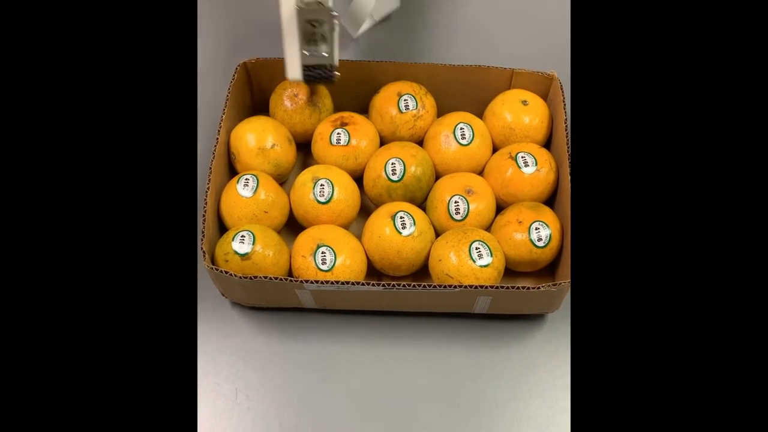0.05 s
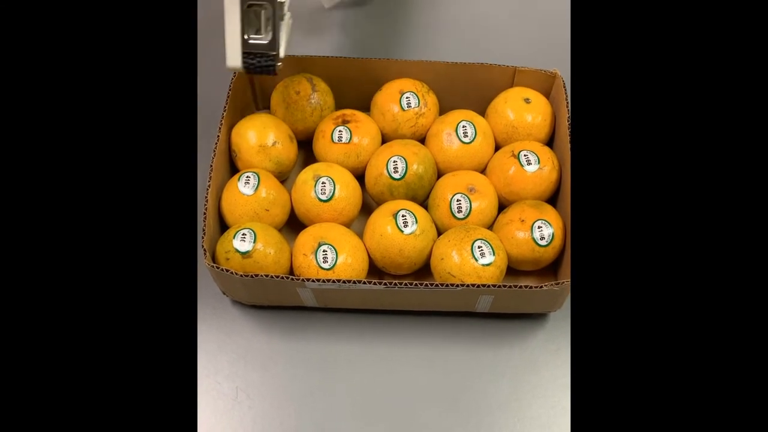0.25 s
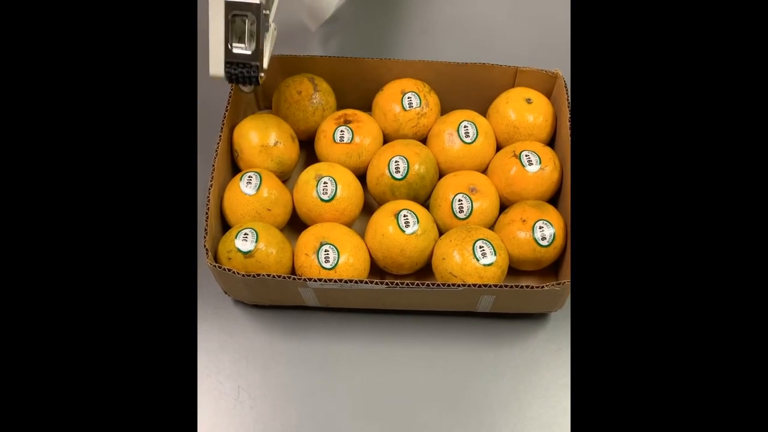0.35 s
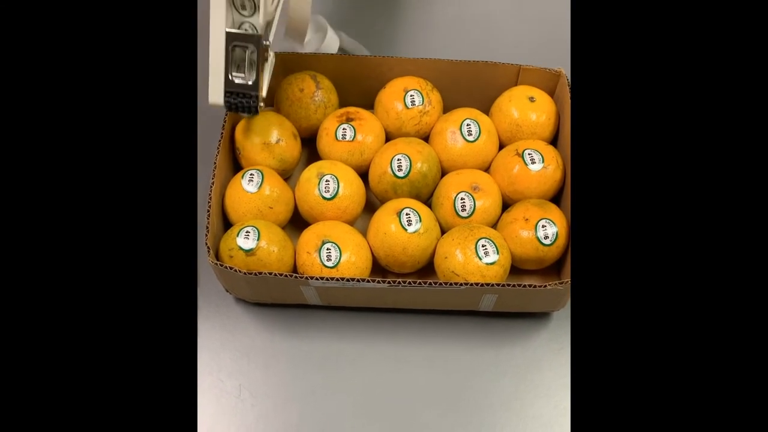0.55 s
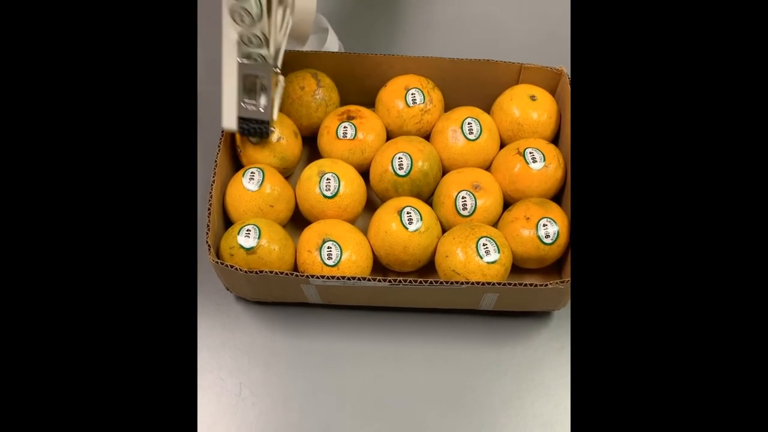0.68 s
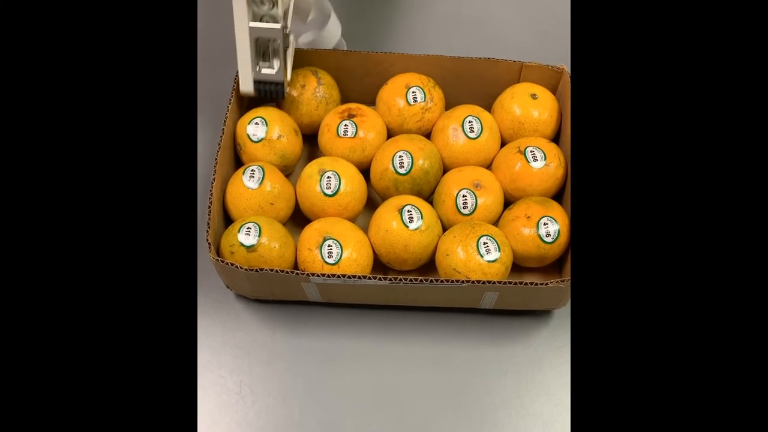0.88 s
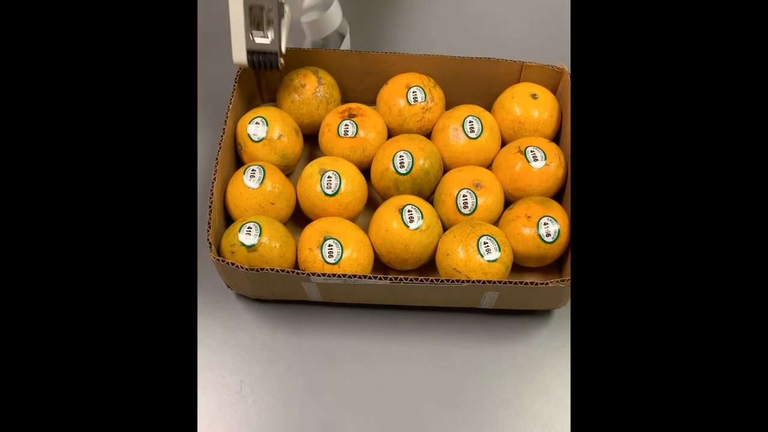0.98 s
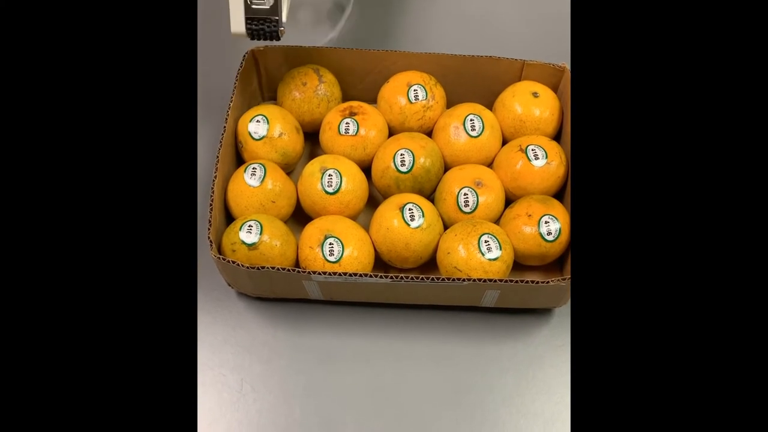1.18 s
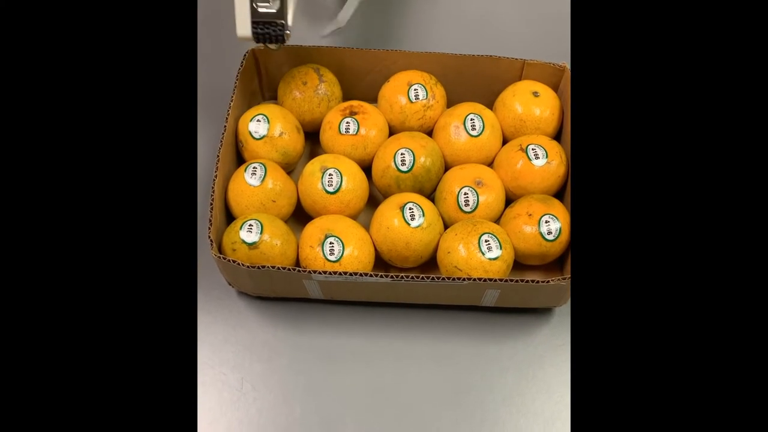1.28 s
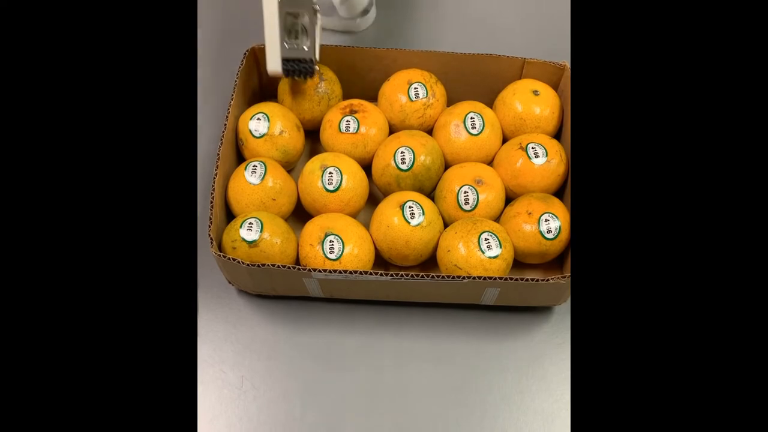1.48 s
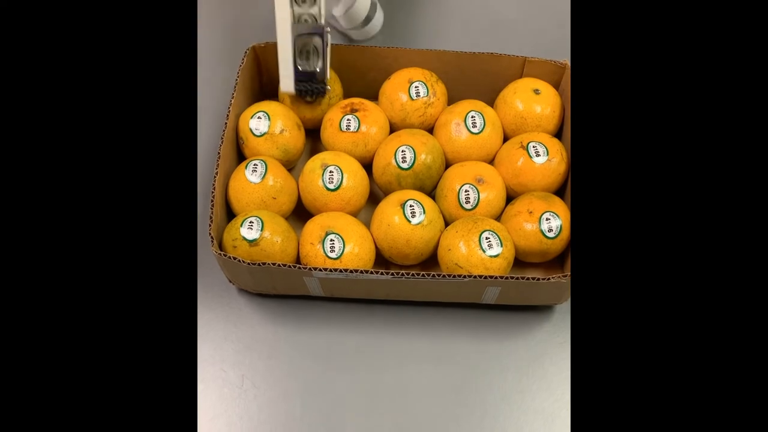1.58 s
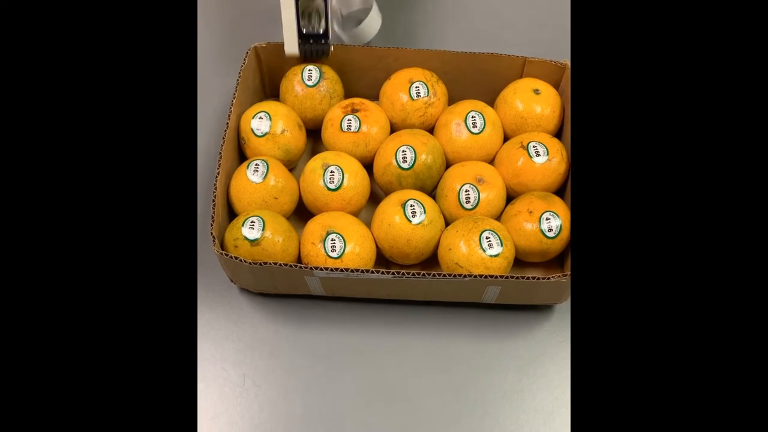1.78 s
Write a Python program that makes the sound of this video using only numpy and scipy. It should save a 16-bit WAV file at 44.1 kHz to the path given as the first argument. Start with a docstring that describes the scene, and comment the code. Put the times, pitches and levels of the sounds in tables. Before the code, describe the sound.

Two bursts of plastic clicking and ratcheting from a label applicator pressing stickers onto fruit.

```python
"""Labelling fruit in a box

A small room, a close stereo pair, a handheld applicator putting stickers on two fruits in a cardboard
box. Each time the backing tape rasps forward ever louder, the catch snaps and the ratchet rattles back,
ringing the plastic housing. Then the head lands on a fruit, the box thumps on the table and the
sticker crackles. Quiet room air and mains hum lie underneath."""
import sys
import numpy as np
from scipy import signal
from scipy.fft import rfft, irfft
from scipy.io import wavfile

SR = 44100
rng = np.random.default_rng(int(sys.argv[2]) if len(sys.argv) > 2 else 0)


def to_wav(sig):
    """Store sig (one row per channel, or 1-D mono) as 16-bit WAV at the path in sys.argv[1].

    Samples outside -1..1 are clipped; the rate is SR.
    """
    pcm = np.clip(np.atleast_2d(sig), -1, 1) * 32767
    pcm = np.round(pcm).astype(np.int16)
    wavfile.write(sys.argv[1], SR, pcm.T)  # frames by channels


N = 81585
T = np.arange(N) / SR

# Modes of the plastic housing. Each row: frequency in Hz, level in dB, t60 in seconds.
HOUSING_MODES = [(458, -16, 0.13), (934.6, -2.5, 0.12), (1182, -12, .07), (1385, -6.5, .05),
                 (1453, -8.5, 0.15), (1550, -3.5, 0.12), (1852, -1, .055), (1920, -4.5, 0.042),
                 (2377, -6, 0.11), (2820, -7, .035), (3300, -13, 0.051), (4440, -7.5, .025)]
# Spectrum of the housing's short clack. Each row: frequency in Hz, relative level in dB.
CLACK_COLOUR = [(40, -55), (130, -40), (280, -17.5), (650, -17.5), (950, -5), (1300, 3), (1900, 0),
                (2500, -6.5), (3200, -14), (6000, -33.5)]

TREBLE_LEAD_S, BODY_LEAD_S = 0.00012, 0.00005  # the left microphone hears it this much sooner
TICK_ROOM = dict(early_db=-12.5, late_db=-32.5, lead_s=TREBLE_LEAD_S)
BOX_ROOM = dict(early_db=-2, late_db=-15.5, lead_s=BODY_LEAD_S)


def undb(db):
    """Decibels to gain."""
    return 10 ** (np.asarray(db) / 20)


def unit(x):
    """Scale a response to unit energy."""
    return x / np.sqrt(np.sum(x ** 2))


def through(x, response):
    """Play a signal through a response."""
    return signal.fftconvolve(x, response)[:N]


def colour(points, size=2048):
    """Minimum-phase response of unit energy, shaped by (Hz, dB) points."""
    hz, db = np.array(points).T
    gain = undb(np.interp(np.log(np.fft.rfftfreq(size, 1 / SR) + 1), np.log(hz), db))
    cepstrum = irfft(np.log(gain))
    cepstrum[1:size // 2] *= 2
    cepstrum[size // 2 + 1:] = 0
    return unit(irfft(np.exp(rfft(cepstrum))))


def ring(modes, pitch=1, size=22000):
    """Damped sines of a struck object, alternating in sign."""
    t = T[:size]
    return sum((-1) ** k * undb(db - 60 * t / t60) * np.sin(2 * np.pi * hz * pitch * t)
               for k, (hz, db, t60) in enumerate(modes))


def blow(s):
    """A single impulse at s seconds."""
    return 1. * (np.arange(N) == int(s * SR))


def fade(s, decay_s, attack_s=.0001):
    """Quick rise that ends at s, exponential release."""
    return np.exp(-np.maximum(s - T, 0) / attack_s - np.maximum(T - s, 0) / decay_s)


def grit(per_s, scatter_db=4):
    """Dense stick-slip grains of uneven size, rms 1."""
    slips = rng.random(N) < per_s / SR
    sizes = slips * undb(scatter_db * np.clip(rng.standard_normal(N), -2, 2))
    energy = np.abs(through(sizes ** 2, fade(0, 0.00045)))
    grains = np.sqrt(energy) * rng.standard_normal(N)
    return grains / np.std(grains)


def clacks(strike_db=12, chatter_db=-3, grip_detune=0.041):
    """Catch, lever and head scrape home, strike the housing and chatter. Gives crack and body."""
    # Each row: time in seconds, crack level in dB, housing level in dB, crack decay in seconds.
    strikes = [(0.1018, -53, -52.5, 0.00159), (0.1269, -47, -46.5, 0.00245), (0.1750, -43, -49.5, 0.0015),
               (0.1852, -47.5, -45.5, 0.0055), (0.214, -36.5, -38.5, 0.0043), (0.2343, -22, -39, 0.0024),
               (0.2394, -17, -28, 0.00178), (0.2427, -38, -28, 0.003), (0.3797, -51.5, -43, 0.009),
               (0.4014, -25, -30.5, 0.0014), (0.4123, -22, -33, 0.0037), (0.461, -30, -53, 0.00153),
               (0.4792, -31.5, -38, .0035), (0.6096, -74, -47.5, 0.00076), (0.6180, -36, -53, .003),
               (0.6231, -28, -40, 0.0013), (0.6426, -46.5, -47, 0.0059), (0.8490, -60, -62, 0.0017),
               (1.0050, -54, -56, .0028), (1.0304, -45, -48.5, 0.0038), (1.057, -57.5, -64.5, 0.0055),
               (1.0809, -45, -51.5, .0022), (1.0956, -41.5, -47, 0.0023), (1.1358, -20.5, -38.5, 0.0034),
               (1.142, -23.5, -25.5, 0.0019), (1.1446, -36, -39.5, 0.0014), (1.2752, -46, -35.5, 0.0025),
               (1.2942, -30.5, -37.5, 0.011), (1.3754, -28.5, -39, 0.0026), (1.4930, -80, -58.5, 0.0013),
               (1.5070, -36, -54, 0.0054), (1.5127, -30, -40.5, 0.0008), (1.5380, -46, -54.5, 0.006)]
    pitches = 1 + grip_detune * rng.uniform(-1, 1, 64)  # the grip shifts the modes from clack to clack
    chatter = rng.standard_normal(N)
    crack, body = 0, 0
    for (s, db, body_db, decay), pitch in zip(strikes, pitches):
        envelope = fade(s, decay, attack_s=0.0013)
        push = undb(strike_db) * blow(s) + undb(chatter_db) * envelope * chatter
        crack += undb(db) * envelope
        body += undb(body_db) * housing(push, pitch)
    return crack * rng.standard_normal(N), body


def ratchet(teeth_per_s=620, tooth_s=.0013, jitter=0.1, scatter_db=1.5, ring_db=-5, clatter_db=-3):
    """The pawl skips over a quick, uneven run of teeth. Gives crack and body."""
    # Each row: start and end in seconds, crack and housing levels in dB, housing pitch ratio.
    runs = [(0.4196, 0.4404, -25.5, -30, .87), (1.3019, 1.3203, -25, -30.5, 0.99)]
    crack, body = 0, 0
    for start, end, db, body_db, pitch in runs:
        offsets, sizes = rng.standard_normal((64, 2)).T
        times = start + (np.arange(len(offsets)) + jitter * offsets) / teeth_per_s
        teeth = sum(undb(scatter_db * size) * fade(s, tooth_s)
                    for s, size in zip(times, sizes) if s < end)
        crack += undb(db) * teeth * rng.standard_normal(N)
        clatter = undb(clatter_db) * through(teeth * rng.standard_normal(N), colour(CLACK_COLOUR))
        body += undb(body_db) * (clatter + undb(ring_db) * housing_sustain(teeth, pitch))
    return crack, body


def tape(grains_per_s=1500, stop_s=0.0011, feed_body_db=-13):
    """The backing tape rasps louder as it speeds up; the sticker is rubbed on. Gives rasp and body."""
    # Each row: start and end in seconds, level at the end in dB, rise in dB per second.
    feeds = [(0.10, 0.236, -32, 300), (0.995, 1.139, -28.5, 325)]
    # Sticker on peel. Each row: middle and half length in seconds, rasp and housing levels in dB.
    rubs = [(0.648, .028, -53, -54), (1.565, .03, -65, -65), (1.657, .022, -53, -58),
            (1.727, .012, -56, -61)]
    rasp = 0
    for start, end, db, rise in feeds:
        gate = (T > start) * np.exp(-np.maximum(T - end, 0) / stop_s)
        rasp += undb(db - rise * np.abs(end - T)) * gate
    push = undb(feed_body_db) * rasp
    for s, half, db, body_db in rubs:
        swell = np.exp(-((T - s) / half) ** 2)
        rasp += undb(db) * swell
        push += undb(body_db) * swell
    return rasp * grit(grains_per_s), housing(push * grit(grains_per_s))


def housing(push, pitch=1, ring_db=-6.5):
    """The plastic shell gives a short clack and rings on in its modes."""
    ringing = undb(ring_db) * unit(ring(HOUSING_MODES, pitch, size=6000))
    clack = colour(CLACK_COLOUR)
    return through(push, ringing + np.pad(clack, (0, len(ringing) - len(clack))))


def housing_sustain(push, pitch, waver_rad=0.011):
    """A run of blows keeps the shell ringing; each mode's energy builds and decays, its phase wanders."""
    ringing = 0
    for hz, db, t60 in HOUSING_MODES:
        decay = undb(-60 * T / t60) ** 2
        energy = np.abs(through(push ** 2, decay / decay.sum()))
        phase = 2 * np.pi * hz * pitch * T + waver_rad * np.cumsum(rng.standard_normal(N))
        ringing += undb(db) * np.sqrt(energy) * np.sin(phase)
    return ringing


def latch(at_s=1.3746, level_db=-15.5, swell_s=0.0012):
    """A short metallic ping that swells as the latch slides home."""
    # Each row: frequency in Hz, level in dB, t60 in seconds.
    modes = [(4150, -8, .014), (4530, 0, .02), (7100, -12, .01), (9900, -12, .01)]
    ping = ring(modes)
    ping *= np.minimum(T[:len(ping)] / swell_s, 1)
    return in_room(undb(level_db) * through(blow(at_s), ping), **TICK_ROOM)


def spring():
    """The spring in the head twangs as it is loaded."""
    # Each row: time in seconds, level in dB.
    twangs = [(0.1277, -46), (1.0304, -47), (1.5121, -50)]
    # Each row: frequency in Hz, level in dB, t60 in seconds.
    modes = [(1260, -7, .03), (1512, -1.5, .04)]
    return through(sum(undb(db) * blow(s) for s, db in twangs), ring(modes))


def ticks():
    """Thin, bright snaps of sticker and tape."""
    # Each row: time in seconds, level in dB, decay in seconds.
    snaps = [(0.4760, -17, 0.00099), (0.649, -35, 0.0042), (0.6711, -31, 0.0031), (0.6900, -36.5, 0.0015),
             (0.724, -47.5, 0.0017), (0.7372, -47, 0.00075), (0.7896, -50, 0.0029), (0.8478, -42, 0.0011),
             (1.3592, -20, 0.0011), (1.653, -28.5, .0011), (1.6592, -30.5, 0.00057), (1.665, -36.5, 0.0016),
             (1.6925, -38, 0.00097), (1.7076, -38.5, .002), (1.7360, -36.5, 0.00215)]
    # Each row: frequency in Hz, relative level in dB.
    spectrum = [(60, -44.5), (400, -13), (1500, -8), (3000, -5.5), (5000, 2.5), (7000, -0.5), (10000, -1.5),
                (12500, -0.5), (16000, -9)]
    envelope = sum(undb(db) * fade(s, decay) for s, db, decay in snaps)
    return in_room(through(envelope * rng.standard_normal(N), colour(spectrum)), **TICK_ROOM)


def box_thumps(push_s=0.00237):
    """The fruit sinks, and its soft push rocks the box on the table."""
    # Each row: time in seconds, level in dB.
    thumps = [(0.060, -60), (0.184, -60.5), (0.545, -58), (0.658, -43), (0.725, -49), (1.554, -43.5),
              (1.617, -53.5), (1.682, -48.5), (1.752, -52.5)]
    # The box on the table. Each row: frequency in Hz, level in dB, t60 in seconds.
    modes = [(45.4, -5.5, 0.3), (60.6, 0.5, .16), (112, -2.5, 0.1), (159, -0.5, .1)]
    push = T * np.exp(-T / push_s)
    force = through(sum(undb(db) * blow(s) for s, db in thumps), 2 * push / push.sum())
    return through(force, ring(modes))


def box_knocks():
    """Fruit knocks hollowly on the cardboard."""
    # Each row: time in seconds, level in dB, pitch ratio.
    knocks = [(0.055, -59.5, 0.59), (0.541, -56, 0.66), (0.640, -44, 1.1), (0.783, -57, 0.65),
              (1.54, -49.5, 0.866), (1.7196, -43, 0.94), (1.7366, -37.5, 0.97)]
    # The cardboard. Each row: frequency in Hz, level in dB, t60 in seconds.
    modes = [(299.5, -7, 0.043), (466, -11.5, 0.031), (652, -10, 0.039), (841, -4, 0.042), (958, -5, 0.056)]
    ringing = sum(undb(db) * through(blow(s), ring(modes, pitch)) for s, db, pitch in knocks)
    return in_room(ringing, **BOX_ROOM)


def scuffs(grains_per_s=500):
    """Dull stick-slip friction as the lever is squeezed and the head slides on the peel."""
    # Each row: middle and half length in seconds, level in dB.
    slides = [(0.214, 0.042, -57.5), (0.654, 0.038, -60), (1.083, 0.064, -68), (1.559, 0.027, -64),
              (1.667, 0.026, -63)]
    # Each row: frequency in Hz, relative level in dB.
    spectrum = [(40, -19), (120, -3.5), (280, -1), (600, -1.5), (1000, -4.5), (2000, -22), (5000, -45.5)]
    swell = sum(undb(db) * np.exp(-((T - s) / half) ** 2) for s, half, db in slides)
    return in_room(through(swell * grit(grains_per_s), colour(spectrum)), **BOX_ROOM)


def in_room(x, early_db, late_db, lead_s, early_t60_s=0.1, late_t60_s=0.41, scatter_db=-8.5):
    """Direct sound at two close microphones, quick echoes from table and box, then the room's tail."""
    lead = np.exp(2j * np.pi * np.fft.rfftfreq(2 * N, 1 / SR) * lead_s)
    left = irfft(rfft(x, 2 * N) * lead)[:N]
    onset = np.minimum(T / 0.00056, 1) ** 2
    channels = []
    for direct in (left, x):
        tails = sum(undb(db) * unit(rng.standard_normal(N) * onset * undb(-60 * T / t60))
                    for db, t60 in ((early_db, early_t60_s), (late_db, late_t60_s)))
        # Edges near each microphone scatter the sound in their own way.
        scatter = unit(np.diff(rng.standard_normal(N) * fade(0, 0.00033), prepend=0))
        channels.append(direct + through(x, tails + undb(scatter_db) * scatter))
    return np.array(channels)


def background(air_db=-74, side_db=-9, hum_hz=119):
    """Quiet room air all around, and a mains hum with its stronger octave in the centre."""
    # The air. Each row: frequency in Hz, relative level in dB.
    spectrum = [(15, -9.5), (55, -7), (100, -4.5), (200, -13), (350, -19.5), (1000, -28.5), (3000, -37),
                (8000, -32), (16000, -43.5)]
    mid, side = (through(rng.standard_normal(N), colour(spectrum)) for _ in range(2))
    air = mid + undb(side_db) * side * np.array([[1], [-1]])
    phase = 2 * np.pi * hum_hz * T
    hum = np.sqrt(2) * (undb(-88) * np.sin(phase) + undb(-81) * np.sin(2 * phase))
    return undb(air_db) * air + hum


def scene(low_cut_hz=230, housing_right_db=3.5):
    """The applicator close up, its housing louder on the right, with the box and the room behind."""
    # The mechanism's bright crack and rasp. Each row: frequency in Hz, relative level in dB.
    crack_colour = [(60, -51), (300, -24.5), (1800, -19.5), (3200, -4), (4300, 7), (5200, -4), (6700, 0.5),
                    (9500, -2), (11000, -5.5), (12400, -5.5), (14000, -5.5), (16000, -11.5)]
    crack, body = np.sum([tape(), ratchet(), clacks()], axis=0)
    low_cut = signal.butter(2, low_cut_hz, "high", fs=SR, output="sos")  # too small to radiate bass
    body = signal.sosfilt(low_cut, body) + spring()
    crack = in_room(through(crack, colour(crack_colour)), early_db=-7.5, late_db=-23.5,
                    lead_s=TREBLE_LEAD_S)
    body = in_room(body, early_db=-2.5, late_db=-13, lead_s=BODY_LEAD_S)
    pan = undb(np.array([[-housing_right_db], [housing_right_db]]) / 2)
    return crack + pan * body + ticks() + latch() + scuffs() + box_thumps() + box_knocks() + background()


def record(dry):
    """The recorder cuts the top steeply above 16 kHz."""
    return signal.sosfilt(signal.ellip(10, .2, 80, 16000, fs=SR, output="sos"), dry)


dry = scene()
out = record(dry)
to_wav(out)
```